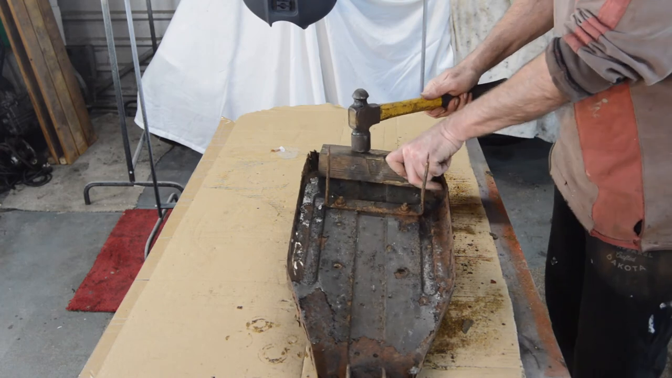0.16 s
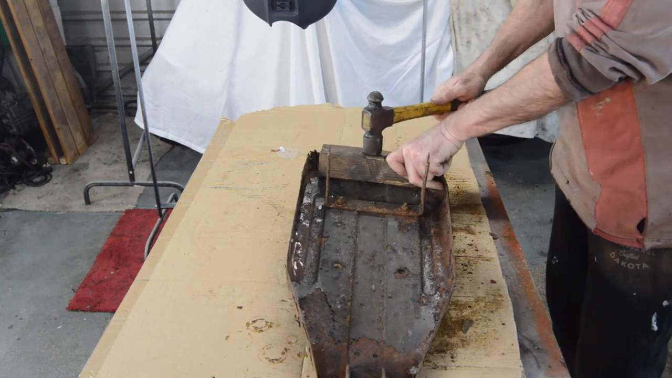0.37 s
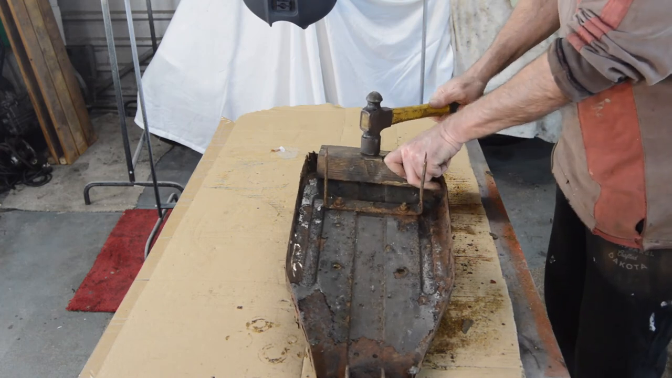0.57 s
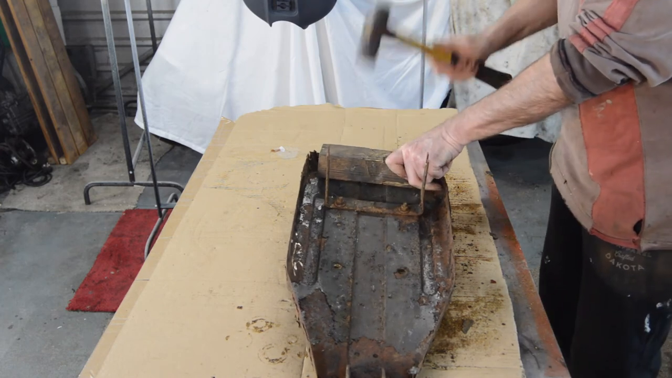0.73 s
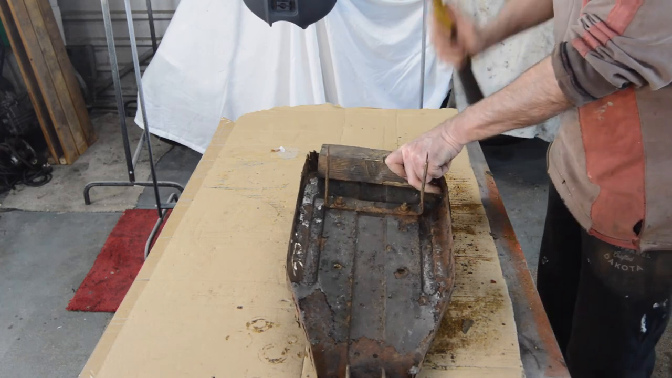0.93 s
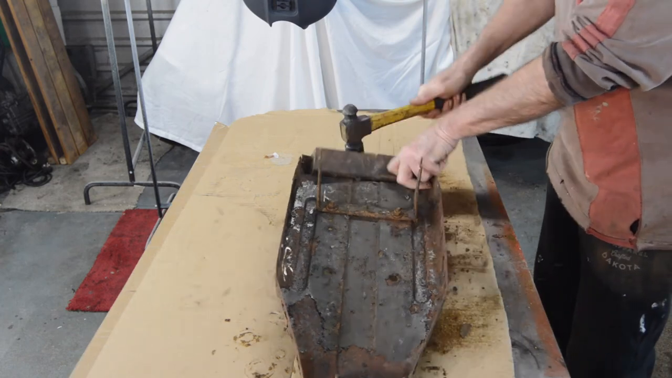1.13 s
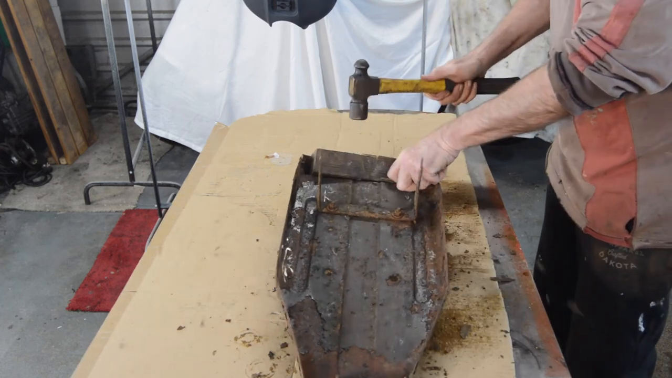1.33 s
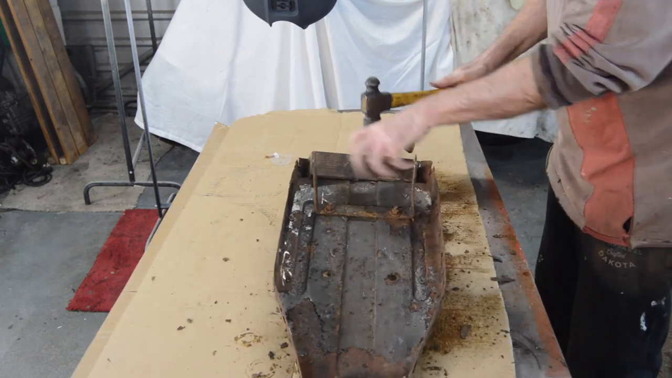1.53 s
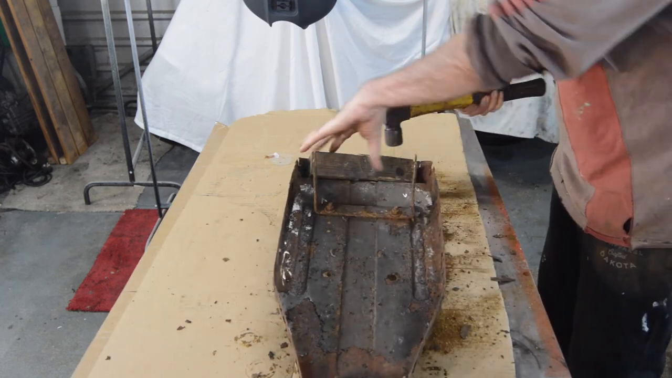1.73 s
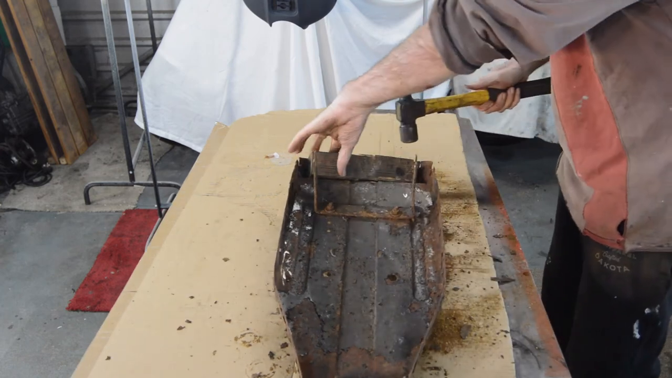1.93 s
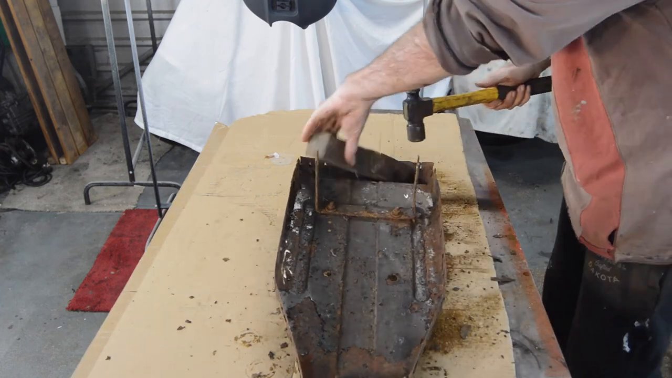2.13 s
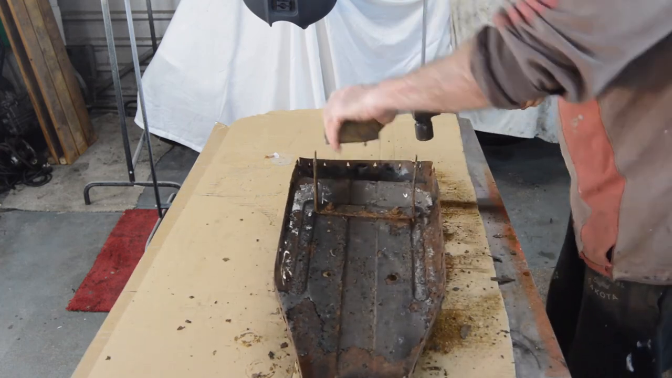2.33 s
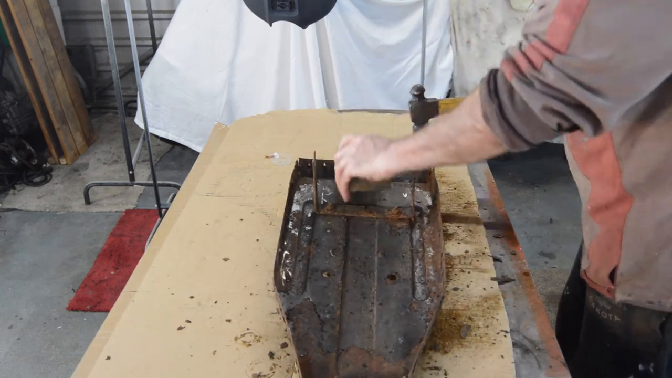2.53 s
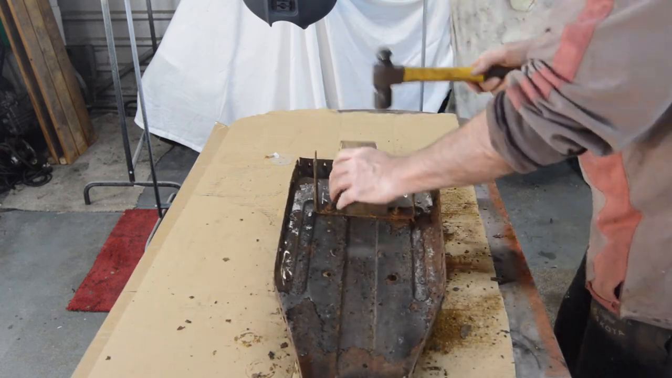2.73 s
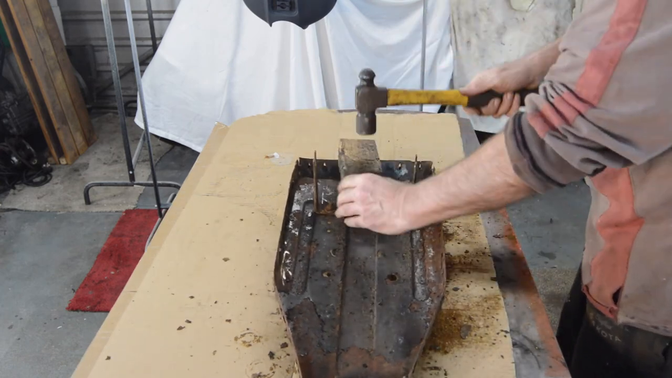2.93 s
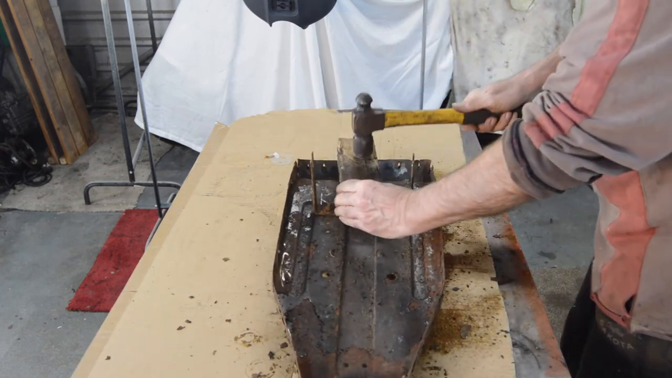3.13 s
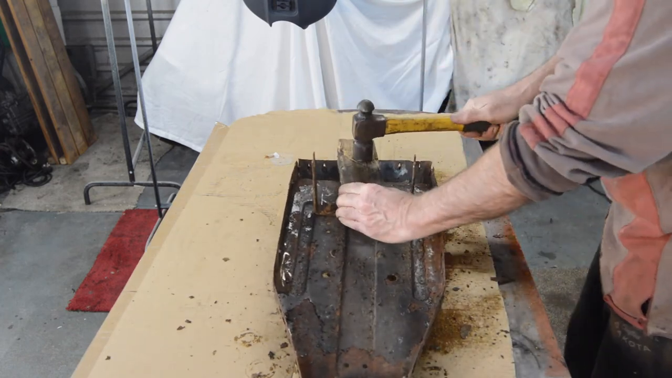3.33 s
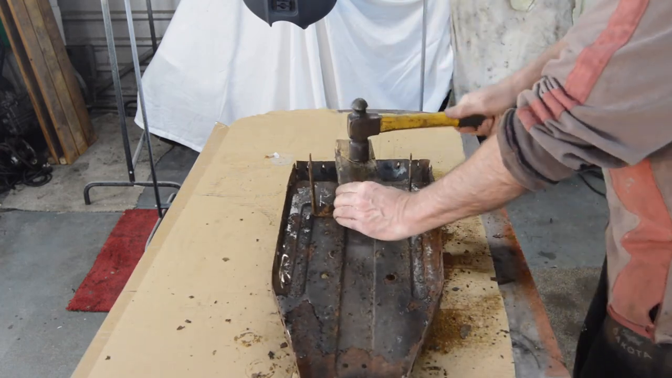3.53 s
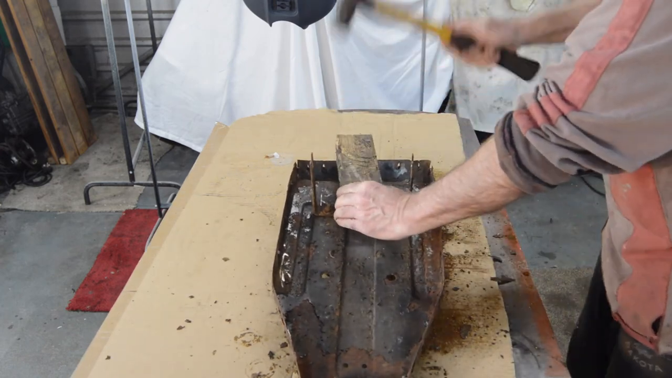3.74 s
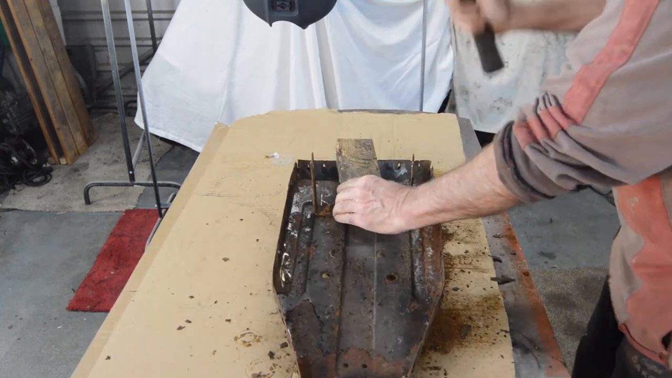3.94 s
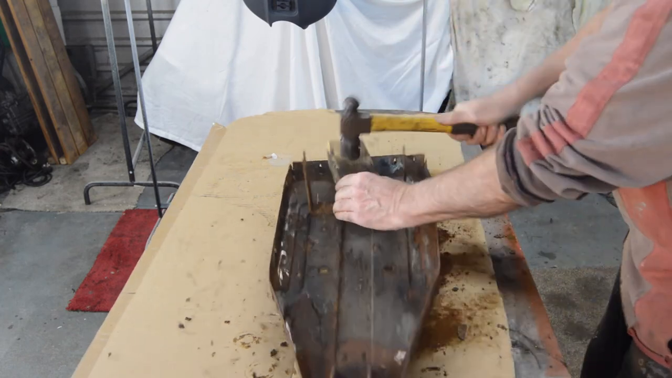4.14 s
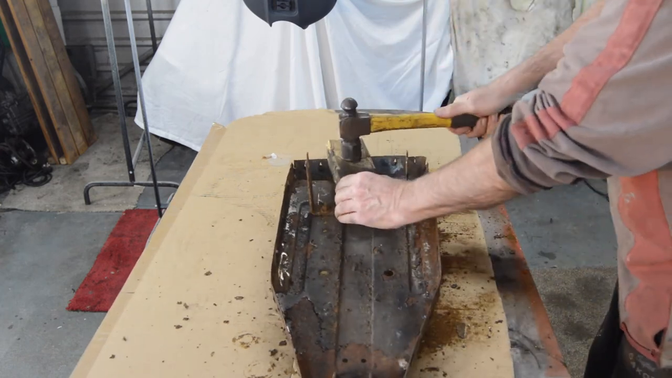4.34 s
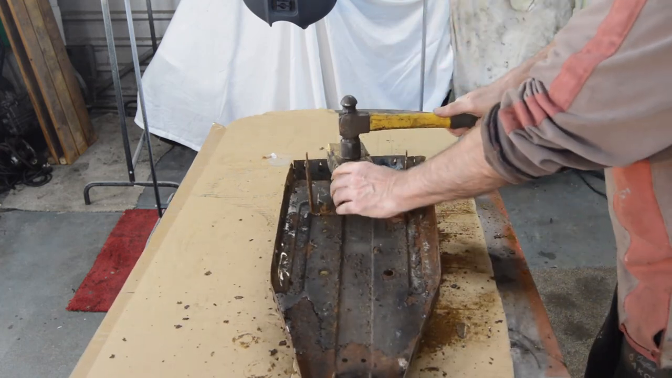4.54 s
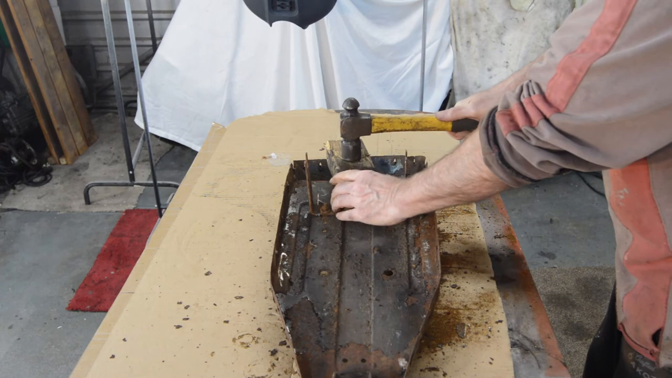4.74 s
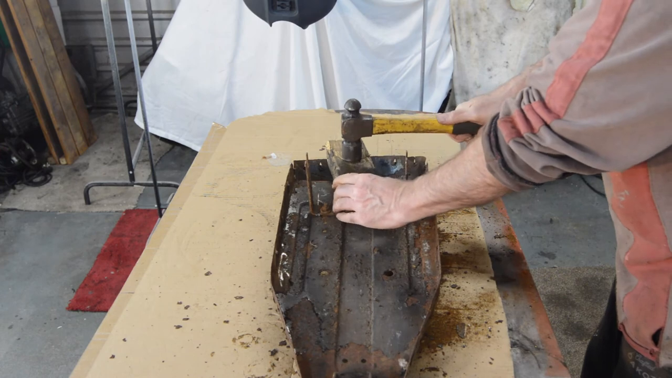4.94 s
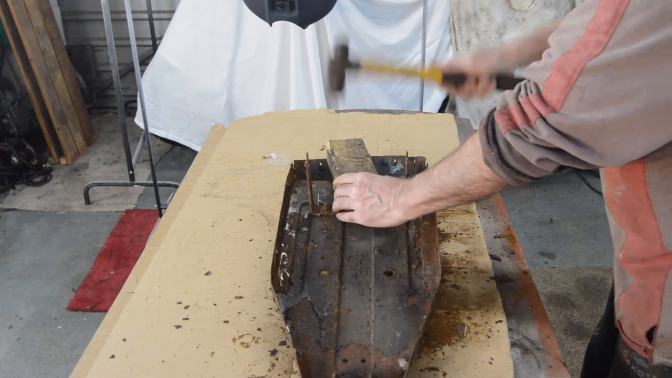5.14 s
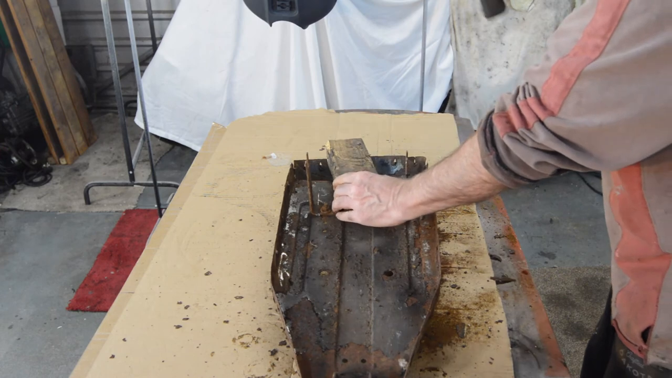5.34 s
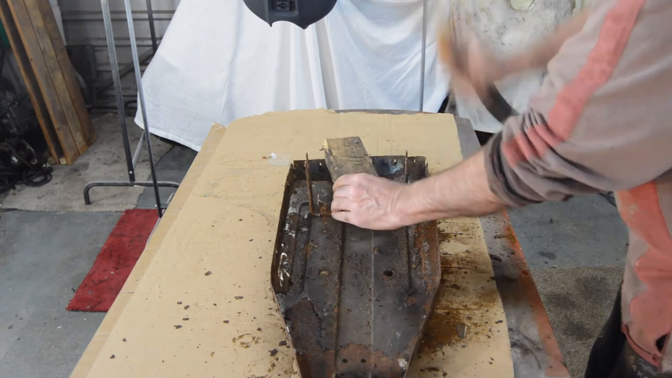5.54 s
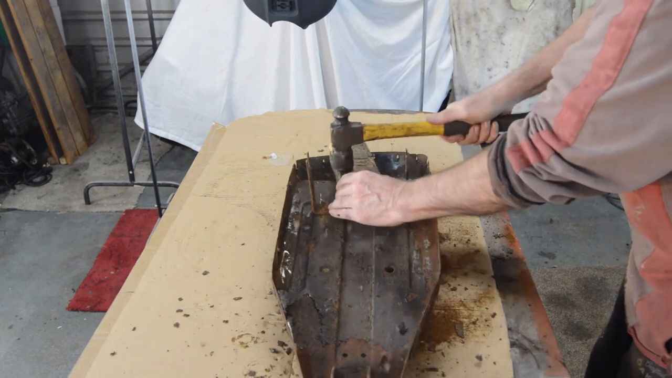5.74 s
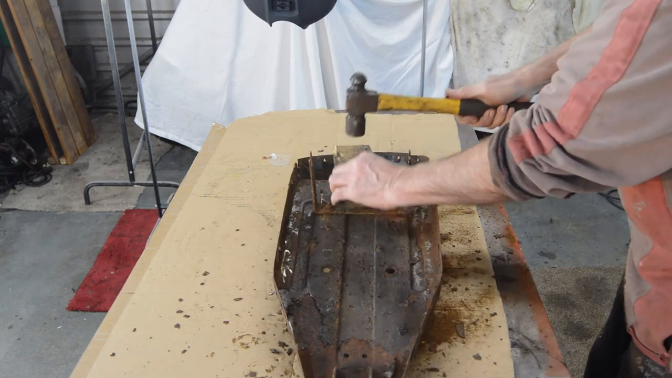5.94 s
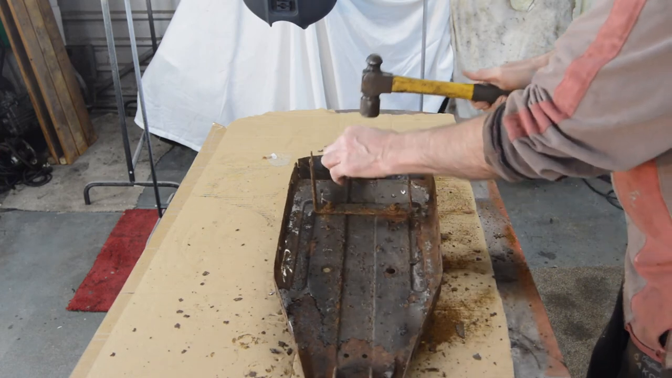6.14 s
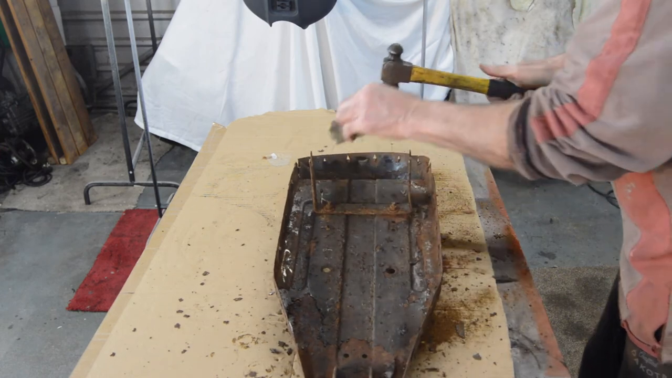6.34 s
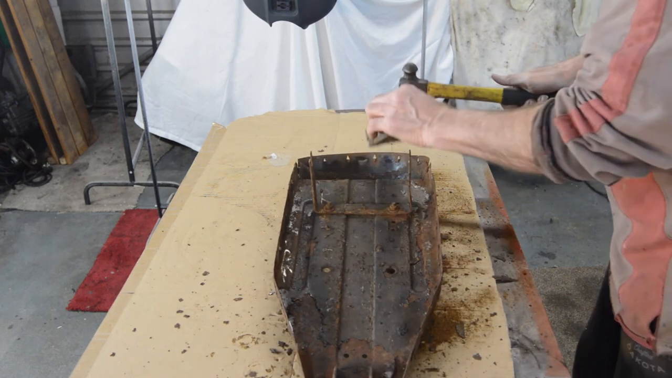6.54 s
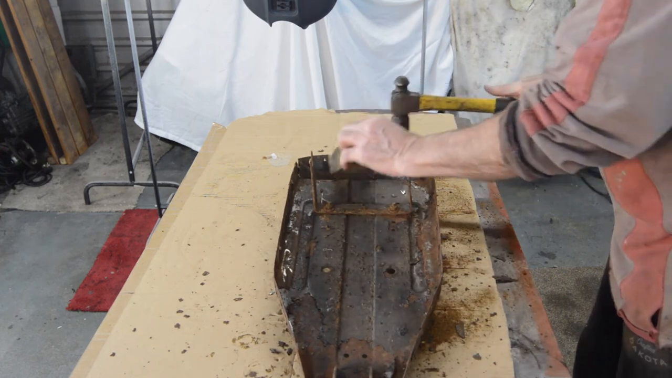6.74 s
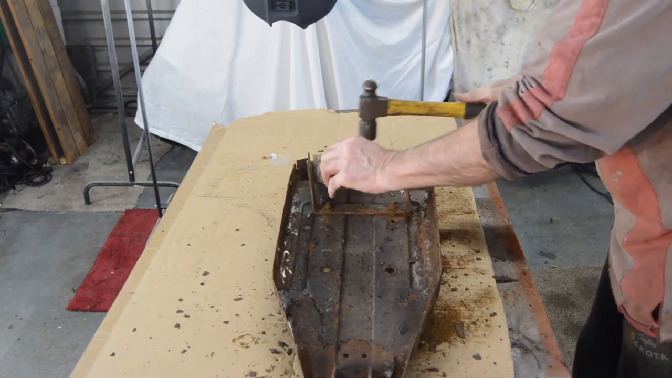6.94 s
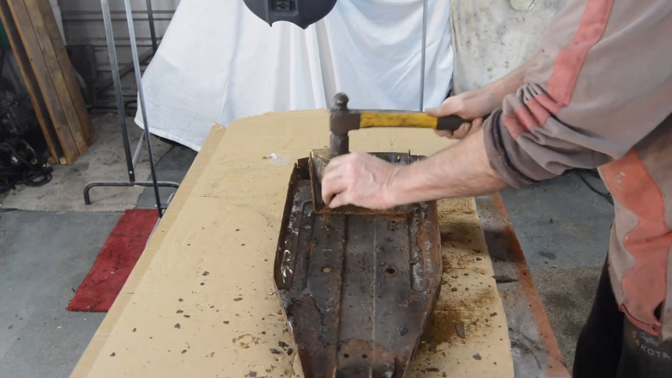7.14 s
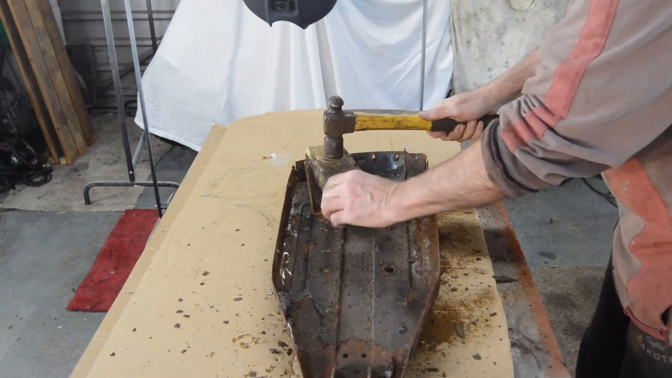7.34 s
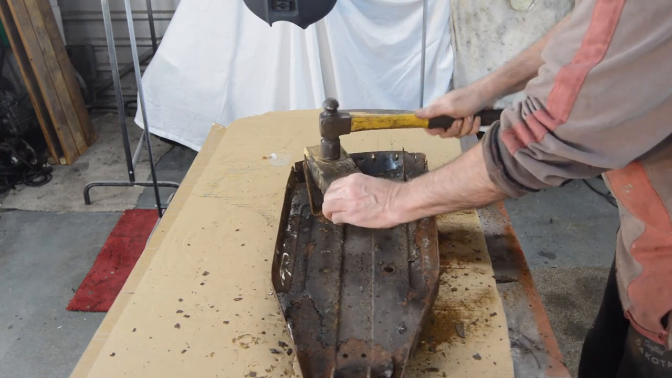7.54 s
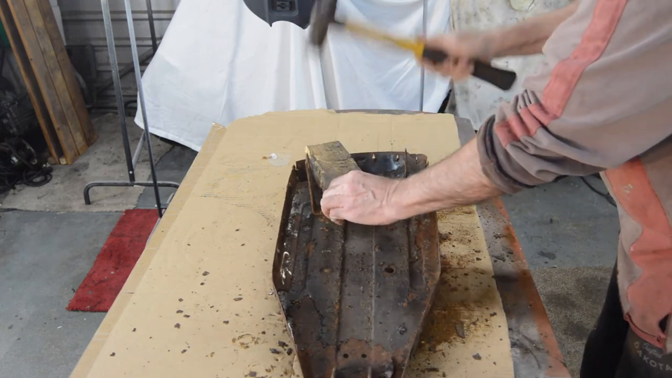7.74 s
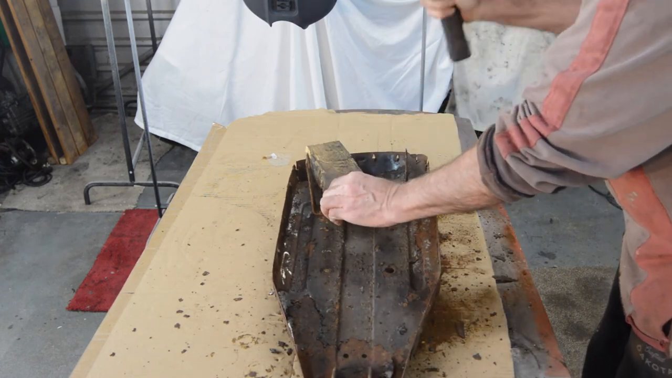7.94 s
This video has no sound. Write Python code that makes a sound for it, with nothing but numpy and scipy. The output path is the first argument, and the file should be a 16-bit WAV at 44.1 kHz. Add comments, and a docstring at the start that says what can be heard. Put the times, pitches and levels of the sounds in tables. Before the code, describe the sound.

Close, raw workshop recording on a bench: soft thuds and scrapes, one huge clipped metallic crash, a bouncing loose part, two solid wood-on-steel knocks, faint hammer taps, a second crash, crunchy little scuffs on grit, a third crash, then more knocks. Blows clang unevenly and rumble the bench; flakes tick down. Short hard room echoes sink into nearly silent, suppressed hiss.

```python
"""In a garage a wooden block is set down on a rusty sheet-steel hull on a bench, then a hammer drives it with
three heavy blows that overload the microphone and shake rust loose; between and after them the block is slid,
tapped and rocked on grit. Struck parts are sums of decaying modes, contacts are noise puffs, rust is sparse clicks.
Overloads fade in, and a suppressor lowers whatever sinks towards the room hiss."""
import sys
import numpy as np
from scipy import signal
from scipy.fft import rfft, irfft
from scipy.io import wavfile
from scipy.ndimage import uniform_filter1d, minimum_filter1d

SR = 44100
rng = np.random.default_rng(int(sys.argv[2]) if len(sys.argv) > 2 else 0)


def undo_db(level):
    """Turn decibels back into plain size, where 20 dB means ten times bigger."""
    steps = np.asarray(level, float) / 20
    return 10 ** steps


def generate_wav(signal):
    """Clip the signal to [-1, 1] and save it as 16-bit WAV at the path in sys.argv[1]."""
    frames = np.transpose(np.atleast_2d(signal))
    scaled = np.clip(frames, -1, 1) * 32767
    pcm = np.round(scaled).astype(np.int16)
    wavfile.write(sys.argv[1], SR, pcm)


N = 351918

# heavy blows: (time [s], hull [dB], crash [dB], rod [dB], grit [dB], clang [dB], middle pitch of the clang [Hz])
BLOWS = [(1.032, -5, 3.5, -43, -30.5, -2, 1335), (4.064, 3, 2, -53.5, -33, 1, 1105),
         (5.596, -5, 4, -43, -33.5, 3.5, 1520)]
# modes of the steel hull: (frequency [Hz], level [dB], t60 [s])
HULL = [(442, -8, 0.36), (490, -4.5, 0.69), (556, -1.5, 0.46), (619, 1, 0.48), (670, -3.5, 0.36),
        (716.6, -4.5, 0.22), (796, -6.5, 0.43), (860, -13.5, 0.81), (965, -7.5, 0.45), (1135, -9, 0.53),
        (1335, -11, 0.9), (1520, -9, 0.48)]
# modes of the bench: (frequency [Hz], level [dB], t60 [s])
BENCH = [(125, -9.5, 0.1), (162, -1.5, 0.15), (198, -0.5, 0.11), (212, -6.5, 0.48), (260, -5, 0.24),
         (278, -6.5, 0.12), (330.7, -7, 0.29), (362, -8, 0.3)]
# modes of brackets and rods: (frequency [Hz], level [dB], t60 [s])
FITTINGS = [(1324, -4, 0.21), (1669, -4.5, 0.071), (2024, -3, 0.099), (2331, -2, 0.14), (2750, -11, 0.093),
            (2975, -7.5, 0.087), (3241, -6, 0.078), (3480, -3.5, 0.068), (3900, -5.5, 0.068),
            (4200, -5.5, 0.064), (4390, -7, .08), (4800, -6.5, 0.14), (5290, -9, .08), (6700, -4.5, 0.096),
            (6170, -6, .055), (7380, -2.5, 0.075), (7880, -5, 0.078)]
DEPTH_DB = 14  # the suppressor lowers the hiss by this much


def evened(x):
    """Scales to unit rms."""
    return x / np.sqrt(np.mean(x ** 2) + 1e-20)


def read(points, hz):
    """Reads a curve of (Hz, value) points on a log frequency axis."""
    f, value = np.transpose(points)
    return np.interp(np.log(hz + 1), np.log(f + 1), value)


def add(mix, s, sound):
    """Mixes a sound in at s seconds, cut at the end."""
    part = mix[round(s * SR):][:len(sound)]
    part += sound[:len(part)]


def coloured(x, points):
    """Filters x by the (Hz, dB) points, to unit rms."""
    gain = undo_db(read(points, np.fft.rfftfreq(len(x), 1 / SR)))
    return evened(irfft(rfft(x) * gain, len(x)))


def grains(count, per_s, size_db):
    """Sparse clicks, most small, a few large."""
    size = undo_db(size_db * np.minimum(rng.exponential(1, count), 4))
    return size * (rng.random(count) < per_s / SR) * rng.standard_normal(count)


def lumps(count, per_s, depth):
    """A level that jumps at each rebound and sinks within milliseconds."""
    rebounds = abs(grains(count, per_s, size_db=1.5))
    level = signal.lfilter([1], [1, -np.exp(-1 / (0.005 * SR))], rebounds)
    return evened(1 + depth * level)


def ring(modes, near_hz=(1,), db_per_octave=0):
    """Decaying modes; the contact favours those near its own pitches, and where it lands adds chance."""
    hz, db, t60 = np.transpose(modes)[:, :, None]
    t = np.arange(SR // 2, dtype=np.float32) / np.float32(SR)
    luck = rng.standard_normal(hz.shape)
    away_octaves = abs(np.log2(hz / np.array(near_hz))).min(1, keepdims=True)
    hz = hz * (1 + .006 * rng.standard_normal(hz.shape))  # each pitch is drawn at random, 0.6 % spread
    struck = rng.choice([-1, 1], hz.shape) * undo_db(db + 2 * luck - db_per_octave * away_octaves)
    decay = np.exp(np.float32(-np.log(1000) / np.maximum(t60, .02)) * t)
    sound = struck[:, 0] @ (decay * np.sin(np.float32(2 * np.pi * hz) * t))
    return sound / np.linalg.norm(struck)


def crack(hz, octaves, t60):
    """A sharp puff of noise in a band around hz, with a weaker 22 ms decay under it."""
    t = np.arange(SR // 4) / SR
    edges_hz = np.clip(hz * 2. ** np.array([-octaves, octaves]), 50, .45 * SR)
    decay = undo_db(-60 * t / max(t60, .002)) + 0.39 * undo_db(-60 * t / 0.022)
    puff = rng.standard_normal(len(t)) * decay
    sound = signal.sosfilt(signal.butter(2, edges_hz, "band", fs=SR, output="sos"), puff)
    return sound / abs(sound).max()


def thud(hz, t60):
    """One strongly damped note."""
    t = np.arange(SR // 4) / SR
    return np.sin(2 * np.pi * hz * t) * undo_db(-60 * t / t60)


def room_hiss():
    """Steady coloured noise, raised by the depth that the suppressor takes off again."""
    # spectrum of the hiss: (frequency [Hz], level [dB per Hz])
    colour = [(18, -43), (30, -19), (55, -3), (239, -5), (345, -8), (16000, -27)]
    suppressed_db = -65
    return undo_db(suppressed_db + DEPTH_DB) * coloured(rng.standard_normal(N), colour)


def garage(x):
    """Sparse echoes of random sign, each band dying at its own speed."""
    # decay of the room: (frequency [Hz], t60 [s])
    decay = [(100, 0.55), (500, 0.41), (2000, 0.34), (5000, 0.32), (12000, 0.14)]
    echoes = np.zeros(SR)
    at = np.arange(250, SR - 20, 20)
    echoes[at + rng.integers(0, 20, len(at))] = rng.choice([-1., 1.], len(at))
    hz, t, z = signal.stft(echoes, SR, nperseg=256)
    tail = signal.istft(z * undo_db(-60 * t / read(decay, hz)[:, None]), SR, nperseg=256)[1]
    return signal.fftconvolve(x, tail / np.linalg.norm(tail))[:N]


def rod():
    """A thin rod in the hull rings on: one faint long note after each blow."""
    hz, t60_s = 843, 6
    out, t = np.zeros(N), np.arange(3 * SR) / SR
    for s, _, _, db, *_ in BLOWS:
        add(out, s, undo_db(db - 60 * t / t60_s) * np.sin(2 * np.pi * hz * t))
    return out


def grit(blow_s, peak_db):
    """Many flakes of uneven size patter on steel and board, each clicking in its own band."""
    # rust raining down: (time after the blow [s], level [dB])
    rain = [(.12, -24.5), (0.182, -4), (.34, 0.5), (.53, -10.5), (0.689, -36)]
    # spectrum of the rain: (frequency [Hz], level [dB])
    colour = [(1000, -21), (3000, -1.5), (6000, -2), (10000, -1), (12000, -34.5), (16000, -21.5)]
    # flakes of six sizes: (pitch [Hz])
    flake_hz = (2560, 3700, 5440, 7400, 8500, 12500)
    s, db = np.transpose(rain)
    t = np.arange(s[0], s[-1], 1 / SR)
    flakes = np.zeros(len(t))
    for hz in flake_hz:
        band = signal.butter(1, [hz / 1.3, hz * 0.94], "band", fs=SR)
        flakes += signal.lfilter(*band, grains(len(t), per_s=1700, size_db=3.0)) / np.sqrt(hz)
    level = undo_db(peak_db + np.interp(t, s, db)) * lumps(len(t), per_s=60, depth=1.4)
    return blow_s + s[0], level * coloured(flakes, colour) * signal.windows.tukey(len(t), .2)


def slide(s, rise, fall, db, hz, ring_db):
    """Uneven catches on the rust, heard through a wide resonance and through the fittings."""
    rise_db, fall_db = 18.5, 25  # below the loudest moment at start and end
    t = np.arange(-rise, fall, 1 / SR)
    catches = grains(len(t), per_s=6700, size_db=4.0)
    rung = signal.fftconvolve(catches, ring(FITTINGS))[:len(t)]
    catches = evened(catches) + undo_db(ring_db) * evened(rung)
    f, _, z = signal.stft(catches, SR, nperseg=256)
    octaves = np.log2((f[:, None] + 50) / hz)
    dull_db_per_octave = 15 - 9 * np.log2(hz / 1000)  # higher strokes lose less treble
    shape = undo_db(np.where(octaves < 0, 0.64 * octaves, -dull_db_per_octave * octaves))
    shape /= 1 + (f[:, None] / 9500) ** 6  # the catches are too slow for the highest treble
    rub = signal.istft(z * shape, SR, nperseg=256)[1][:len(t)]
    stroke_db = np.where(t < 0, rise_db * t / rise, -fall_db * t / fall)
    return s - rise, undo_db(db + stroke_db) * evened(rub) * signal.windows.tukey(len(t), .05)


def rubs():
    """The block slides on rust; rust rains down after each blow."""
    # slides: (loudest time [s], rise [s], fall [s], level [dB], centre [Hz], ring of the fittings [dB])
    strokes = [(0.139, .02, .11, -29.5, 1290, -7.5), (1.715, 0.091, 0.075, -36, 2560, -25),
               (2.124, 0.033, 0.12, -36.5, 3530, -8), (3.436, 0.083, 0.23, -44.5, 1400, -14),
               (3.644, 0.056, 0.088, -41.5, 1486, -13.5), (4.6, .1, 0.55, -40, 1320, -15),
               (4.858, .025, 0.19, -44.5, 1360, -17.5), (6.705, 0.016, 0.018, -30, 950, -19),
               (6.78, 0.035, 0.33, -36, 1036, -8), (7.533, 0.0042, 0.085, -30, 2160, -11.5)]
    out = np.zeros(N)
    for row in strokes:
        add(out, *slide(*row))
    for s, _, _, _, grit_db, *_ in BLOWS:
        add(out, *grit(s, grit_db))
    return out


def tick(hz, dry, octaves):
    """A small hard bit clicks; the less dry it is, the longer it rings."""
    dry = np.clip(dry, 0, 1)
    click = crack(hz, octaves, t60=0.0051)
    return dry * click + (1 - dry) * crack(hz, octaves=.04, t60=0.016 + 0.34 * (1 - dry) ** 2)


def flakes_landing():
    """Each flake clicks in one band."""
    # single flakes: (time [s], level [dB], pitch [Hz], dryness [0-1])
    landings = [(2.3271, -32.5, 1788, 0.64), (2.721, -38, 6100, 0.7), (2.9378, -40.5, 2070, .5),
                (3.072, -37.5, 5900, 0.8), (3.3212, -37, 7300, 0.7), (3.4091, -45.5, 7430, 0.3),
                (4.691, -39.5, 9330, .55), (4.751, -35, 2480, 0.5), (4.847, -34.5, 7120, 0.5),
                (4.848, -31.5, 8950, 0.6), (4.909, -33, 6270, 0.67), (5.4613, -46, 2323, .3),
                (6.2413, -27.5, 3800, .95), (6.5236, -32.5, 8000, 0.7), (6.53, -41, 2083, 0.3),
                (4.4405, -23, 4000, .95), (7.501, -42.5, 3140, 0.3), (2.2563, -33.5, 4660, 0.74)]
    out = np.zeros(N)
    for s, db, hz, dry in landings:
        add(out, s, undo_db(db) * tick(hz, dry, octaves=0.51))
    return out


def bouncing_part():
    """A small loose part bounces, clicking in two bands."""
    # bounces: (time [s], low band [dB], high band [dB])
    bounces = [(1.405, -15.5, -23.5), (1.4527, -10, -10), (1.5897, -18, -25), (1.7966, -32.5, -34),
               (6.327, -46.5, -33), (6.3553, -32.5, -33.5), (7.6382, -45, -29)]
    # the two bands: (centre [Hz])
    band_hz = (1720, 4800)
    out = np.zeros(N)
    for s, *dbs in bounces:
        for db, hz in zip(dbs, band_hz):
            add(out, s, undo_db(db) * tick(hz, dry=1, octaves=0.56))
    return out


def clink(hz):
    """One gritty touch and a short chatter of smaller ones ring the fittings near hz."""
    t = np.arange(SR // 8) / SR
    touches = grains(len(t), per_s=700, size_db=1.5) * undo_db(-60 * t / 0.12)
    touches[0] = 1
    rung = ring(FITTINGS, near_hz=(hz,), db_per_octave=45)
    add(rung, 0, 1.3 * crack(hz, octaves=0.29, t60=0.012))
    return signal.fftconvolve(rung, touches / np.linalg.norm(touches))


def clinks():
    """Steel touches the fittings."""
    # touches: (time [s], level [dB], pitch of the contact [Hz])
    contacts = [(0.132, -34.5, 1324), (0.409, -33.5, 2190), (2.0744, -36, 2331), (2.089, -32, 4600),
                (2.09, -30.5, 7400), (2.116, -35, 1600), (2.125, -37.5, 3241), (2.125, -39, 2331),
                (2.58, -45, 7300), (2.788, -40, 6170), (2.787, -42, 3460), (2.787, -43, 5130),
                (2.581, -45, 4400), (2.787, -34, 2024), (6.5237, -43.5, 4870), (6.5237, -44.5, 2750),
                (6.688, -33.5, 1669), (6.686, -38.5, 3700), (6.763, -38, 2975), (6.765, -41, 6700),
                (6.791, -43.5, 1980), (6.859, -33, 1980), (6.861, -36, 4190), (7.529, -28.5, 2240),
                (7.529, -32.5, 4390)]
    out = np.zeros(N)
    for s, db, hz in contacts:
        add(out, s, undo_db(db) * clink(hz))
    return out


def scuffs():
    """The block rocks on grit: very short thuds, each with a noise puff just below its pitch."""
    # rocking contacts: (time [s], level [dB], pitch [Hz])
    contacts = [(4.531, -24.5, 1210), (4.566, -21.5, 1430), (4.588, -25, 1300), (4.656, -29.5, 1530),
                (4.669, -20.5, 1155), (4.701, -23.5, 1130), (4.753, -25.5, 1300), (4.777, -24, 1080),
                (4.803, -30, 1110), (4.848, -34, 1030), (4.859, -29, 1550), (4.875, -30.5, 1500),
                (4.921, -34, 1240)]
    out = np.zeros(N)
    for s, db, hz in contacts:
        add(out, s, undo_db(db) * (0.86 * thud(hz, t60=0.0092) + 0.63 * crack(0.9 * hz, octaves=0.4, t60=0.031)))
    return out


def hammer_taps():
    """The hammer is laid on the block: a short thud and a rattle of noise."""
    # taps: (time [s], rattle [dB])
    contacts = [(3.573, -27), (3.753, -28.5)]
    hz, thud_re_rattle_db = 940, -2.5
    out = np.zeros(N)
    for s, db in contacts:
        wood = thud(hz, t60=0.034) + 0.79 * crack(hz, octaves=0.25, t60=0.17)
        add(out, s, undo_db(db + thud_re_rattle_db) * wood)
        add(out, s, undo_db(db) * crack(hz=1500, octaves=0.71, t60=.18))
    return out


def wood_on_hull(db, hz, other_hz):
    """Steel and bench ring near two pitches over a short wash; the harder, the more the wood thuds."""
    sound = undo_db(-10.0) * ring(BENCH + HULL, near_hz=(hz, other_hz), db_per_octave=40.5)
    wood = signal.sosfilt(signal.butter(2, hz / 2, "high", fs=SR, output="sos"), thud(hz, t60=0.014))
    wash = crack(hz=1.5 * hz, octaves=0.31, t60=0.37)  # higher modes, blurred together
    add(sound, 0, undo_db(3.0 + 0.26 * db) * wood + undo_db(-22.0) * wash)
    # wood lands too softly to excite the treble
    return undo_db(db) * signal.sosfilt(signal.butter(2, 2180, fs=SR, output="sos"), sound)


def rattle():
    """The loose sheet shakes and sets the fittings ringing."""
    shake = np.pad(crack(hz=1300, octaves=1.0, t60=0.17), (0, SR // 4))
    rung = signal.fftconvolve(crack(hz=3500, octaves=1.1, t60=0.06), ring(FITTINGS))[:len(shake)]
    return shake + 0.6 * rung / abs(rung).max()


def knocks():
    """The wood thuds, hull and bench ring, fittings rattle and the contact snaps."""
    # block set down or tapped:
    # (time [s], thud [dB], thud pitch [Hz], second pitch that rings [Hz], bench [dB], rattle [dB])
    contacts = [(0.213, -19, 485, 174, -24, -58.5), (0.387, -17.5, 487, 200.1, -17.5, -65),
                (0.408, -21, 490, 195, -25, -26.5), (1.299, -6.5, 619, 490, -28.5, -20),
                (2.09, -28, 600, 970, -31, -30.5), (2.123, -20.5, 650, 965, -25, -30),
                (2.181, -26.5, 720, 362, -33.5, -43.5), (2.58, -2.5, 688, 442, -17.5, -33.5),
                (2.787, -3, 615, 521, -19.5, -30.5), (3.195, -16.5, 532, 619, -22.5, -42),
                (6.687, -14.5, 510, 1000, -26.5, -41.5), (6.759, -20.5, 619, 990, -37, -44),
                (6.859, -2.5, 619, 556, -21.5, -28.5), (7.174, -2, 660, 580, -18.5, -25.5),
                (7.529, -20, 746, 340, -31.5, -26)]
    press_db_per_s, snap_under_rattle_db = 4, 12.5
    out, t = np.zeros(N), np.arange(SR // 2) / SR
    for s, db, hz, other_hz, bench_db, rattle_db in contacts:
        # a light knock stays pressed on the steel: added decay per dB under full force
        pressed = undo_db(press_db_per_s * min(db, 0) * t)
        body = wood_on_hull(db, hz, other_hz) + undo_db(bench_db) * ring(BENCH)
        add(out, s, pressed * body + undo_db(rattle_db) * rattle())
        add(out, s, undo_db(rattle_db - snap_under_rattle_db) * crack(hz=6000, octaves=0.46, t60=0.31))
    return out


def clang(hz):
    """The chattering sheet strikes the hull again and again, so its modes flare up unevenly and sag in pitch."""
    sag, sag_s = .15, .08  # the bent sheet rings sharp by this share, then relaxes
    t = np.arange(SR // 2) / SR
    chatter = grains(len(t), per_s=110, size_db=4.5) * undo_db(-60 * t / 0.45)
    held = ring(HULL + FITTINGS, near_hz=(640, hz, 2150), db_per_octave=28.5) * undo_db(-60 * t / 0.35)
    sound = signal.fftconvolve(held, chatter / np.linalg.norm(chatter))
    t = np.arange(len(sound)) / SR
    return np.interp(t + sag * sag_s * (1 - np.exp(-t / sag_s)), t, sound)


def blows():
    """Hull and bench ring, the loose sheet crashes as it bounces and chatters, the bench rocks."""
    # crash of the sheet: (frequency [Hz], level [dB per Hz])
    crash_colour = [(29, -65), (50, -43.5), (150, -16.5), (350, -14.5), (460, -5), (627, 0), (1840, -7.5),
                    (2070, -8), (3760, -23.5), (4770, -19), (9760, -36.5), (15000, -56.5)]
    # bench rocking on its legs: (frequency [Hz], level [dB])
    rumble = [(40, -29.5), (80, -7.5), (160, -2), (260, -3), (500, -34)]
    bench_db, rock_db, crash_t60_s = -14, -20.5, 0.62
    bench_lag_s = .045  # the heavy bench starts to rock a little later
    out, t = np.zeros(N), np.arange(2 * SR) / SR
    for s, hull_db, crash_db, _, _, clang_db, clang_hz in BLOWS:
        add(out, s, undo_db(hull_db) * ring(HULL))
        add(out, s, undo_db(clang_db) * clang(clang_hz))
        add(out, s + bench_lag_s, undo_db(bench_db) * ring(BENCH))
        # the hard face of the hammer lands
        add(out, s, undo_db(crash_db + 13.0) * crack(hz=2130, octaves=1.3, t60=0.13))
        crash = coloured(grains(len(t), per_s=4000, size_db=3.5), crash_colour)
        add(out, s, undo_db(crash_db - 60 * t / crash_t60_s) * crash * lumps(len(t), per_s=45, depth=2.2))
        rock = np.minimum(t / 0.035, 1) * undo_db(rock_db - 60 * t / 1.017)
        add(out, s + bench_lag_s, rock * coloured(rng.standard_normal(len(t)), rumble))
    return out


def scene():
    """All contacts, their echoes and the room hiss."""
    hits = flakes_landing() + bouncing_part() + clinks() + scuffs() + hammer_taps() + knocks() + blows()
    rubbing = rubs()
    echoes = undo_db(-5.5) * garage(hits) + undo_db(-12.0) * garage(rubbing)
    return (hits + rubbing + rod() + echoes + room_hiss())[None]


def fade_in_overloads(x, clipped):
    """At an overload after half a second without one, the gain drops to zero and swells back."""
    over = np.flatnonzero(abs(x) > 1.5)
    starts = over[np.diff(over, prepend=-SR) > SR // 2]
    t, gain = np.arange(SR // 10) / SR, np.ones(N)
    swell = np.sin(np.pi / 2 * np.minimum(t / 0.065, 1)) ** 1.99
    for start in starts:
        peaks = -minimum_filter1d(-abs(x[:start + 50]), size=41)
        last_quiet = np.flatnonzero(peaks < .03)[-1]
        gain[last_quiet:][:len(t)] = swell
    return clipped * gain


def suppress_hiss(x):
    """Bands near their usual quiet level are lowered; after a loud spell the full depth returns slowly."""
    z = signal.stft(x, nperseg=512, noverlap=384)[2]
    power = uniform_filter1d(abs(z) ** 2, size=15, axis=0)
    power = uniform_filter1d(power, size=7, axis=1) + 1e-20
    usual = np.percentile(power, 15, axis=1)[:, None]
    busy_db = np.clip(2 * np.log10(power.sum(0) / usual.sum()), 0, 7.0)
    fall_db = np.arange(len(busy_db)) * 128 / SR * 7  # 7 dB a second
    eased_db = np.maximum.accumulate(busy_db + fall_db) - fall_db
    shut = np.clip((16.0 - 10 * np.log10(power / usual)) / 15.6, 0, 1)
    return signal.istft(z * undo_db(shut * (eased_db - DEPTH_DB)), nperseg=512, noverlap=384)[1][:N]


def top_cut(x):
    """Nothing passes above the cut-off."""
    return signal.sosfilt(signal.butter(12, 16450, fs=SR, output="sos"), x)


def record(dry):
    """Microphone treble loss, the overload, a bass cut that tilts the flat tops, fade-in and hiss suppression."""
    mic = signal.sosfilt(signal.butter(2, 10500, fs=SR, output="sos"), dry[0])
    clipped = mic / (1 + (mic / 0.59) ** 4) ** (1 / 4)
    clipped = signal.sosfilt(signal.butter(3, 120, "high", fs=SR, output="sos"), clipped)
    mix = suppress_hiss(fade_in_overloads(mic, clipped))
    return top_cut(mix[None])


dry = scene()
out = record(dry)
generate_wav(out)
```